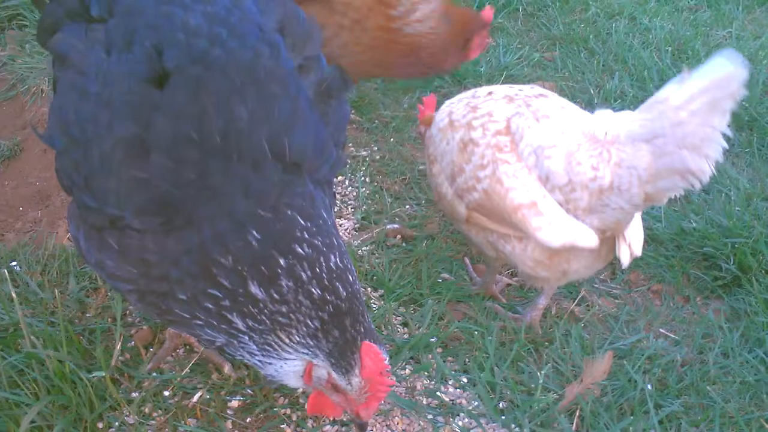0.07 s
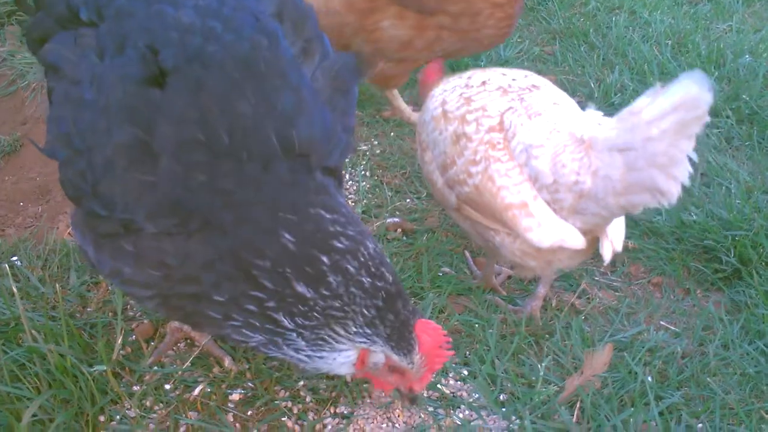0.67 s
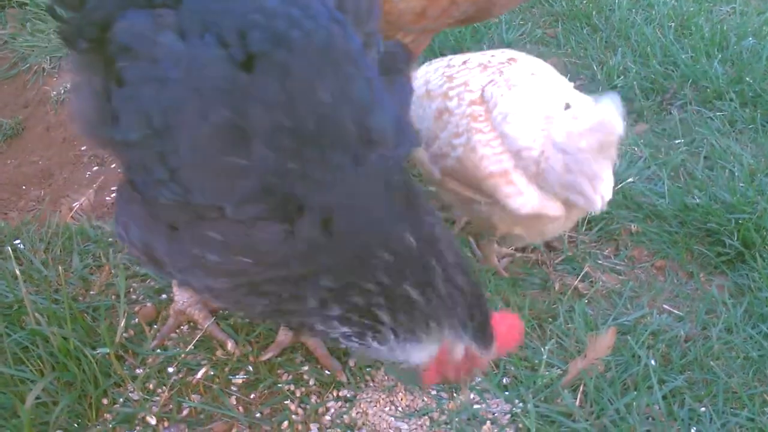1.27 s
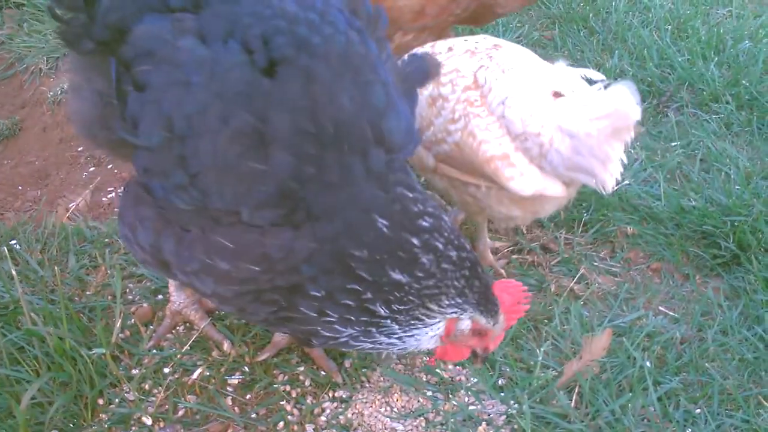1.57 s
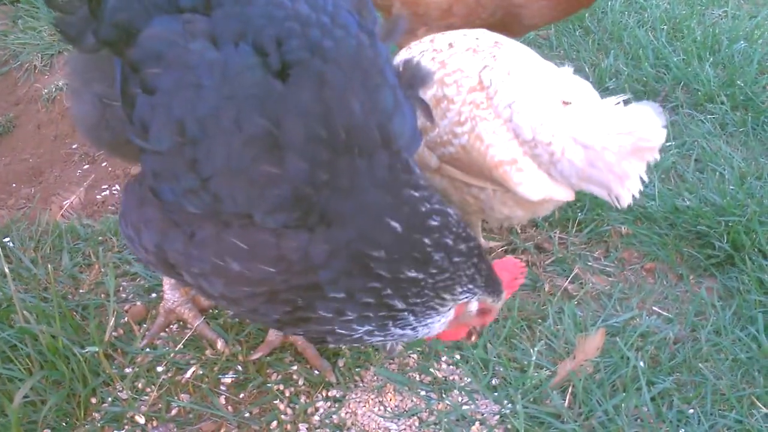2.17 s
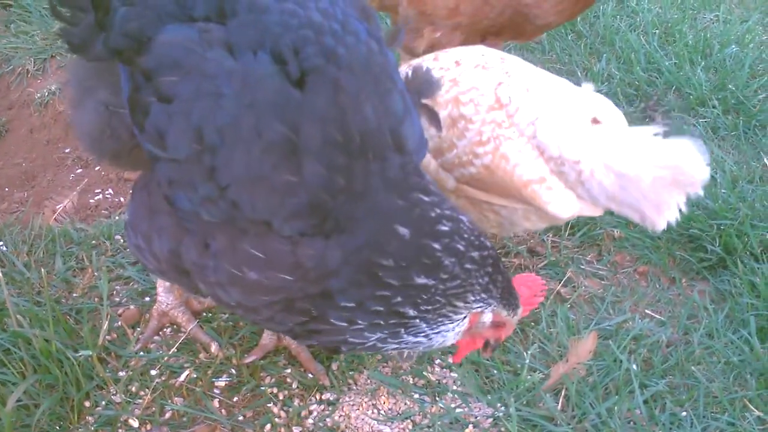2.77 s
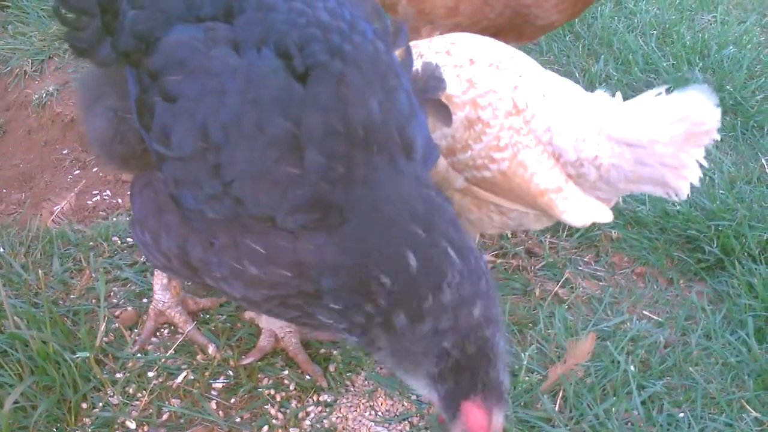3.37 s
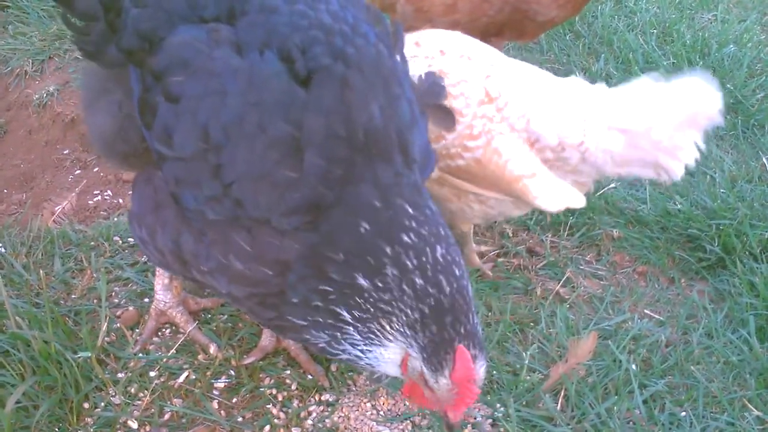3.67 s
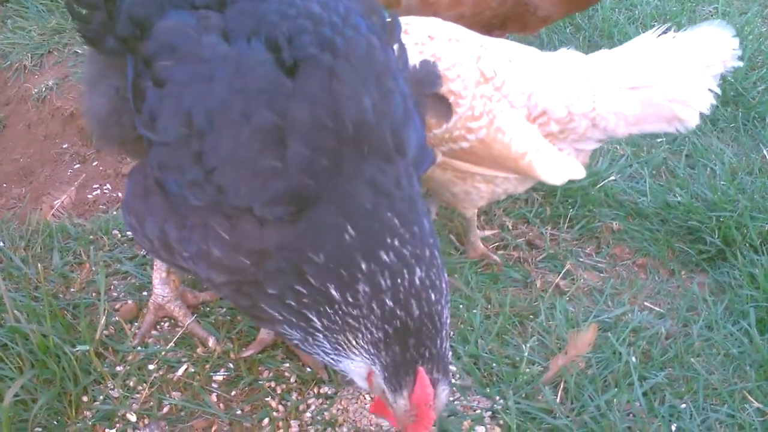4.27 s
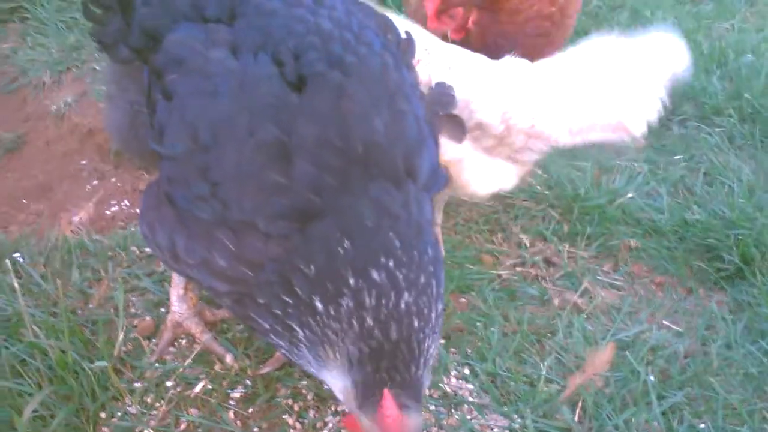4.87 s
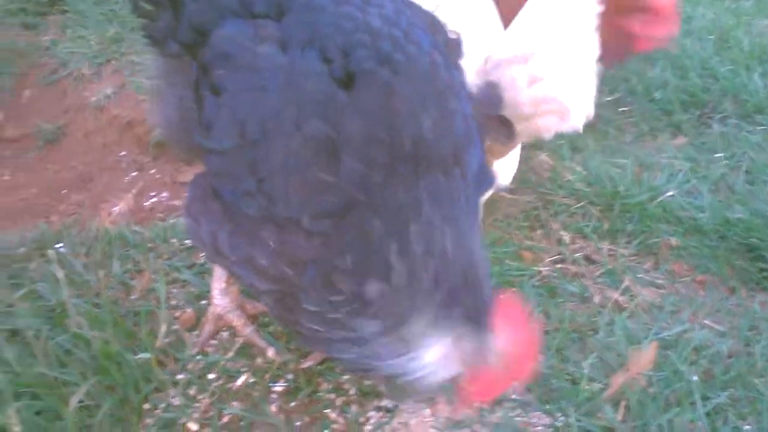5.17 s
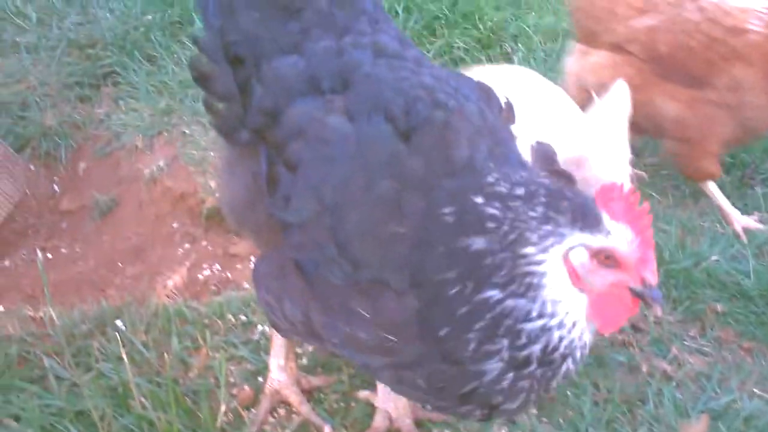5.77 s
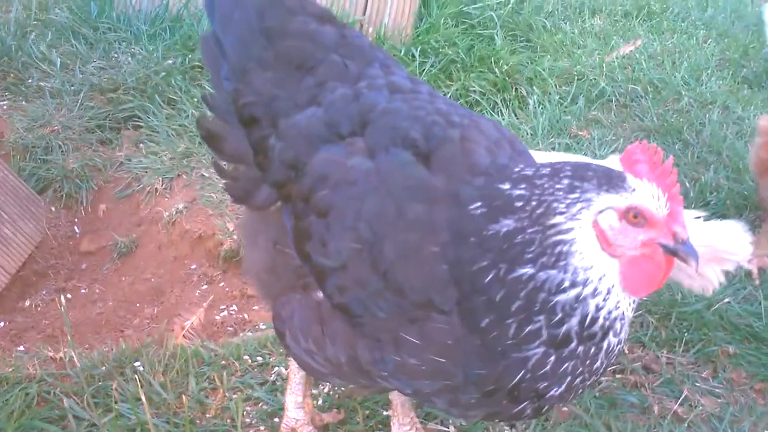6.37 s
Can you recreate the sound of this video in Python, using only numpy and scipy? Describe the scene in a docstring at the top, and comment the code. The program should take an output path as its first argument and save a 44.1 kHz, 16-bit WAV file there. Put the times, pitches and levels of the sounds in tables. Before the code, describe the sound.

Close hen calling outdoors: soft moans, one drawn-out rising call and ever shorter clucks, with low microphone knocks and brushing at the end.

```python
"""An open lawn, hens feeding close to the microphone of a hand-held camera. One gives two soft moans,
then a long swelling call that breaks into ever shorter clucks; a last moan and a small hoot close the
phrase. Her syrinx buzzes through throat and beak. Dull knocks and fumbling reach the microphone through
the camera body, and late on it is raised with a few brushing sounds. Beaks click now and then, and far
birds whistle in a faint outdoor hiss."""
import sys
import numpy as np
from scipy import signal
from scipy.fft import rfft, irfft
from scipy.io import wavfile

SR = 44100
rng = np.random.default_rng(int(sys.argv[2]) if len(sys.argv) > 2 else 0)


def file_out(sig):
    """Save sig as 16-bit WAV at sys.argv[1]."""
    # one column per channel
    cols = np.atleast_2d(sig).T
    # limit, then scale
    lim = np.clip(cols, -1, 1)
    pcm = np.round(lim * 32767).astype(np.int16)
    wavfile.write(sys.argv[1], SR, pcm)


N = 287091
TIME = np.arange(N) / SR


def amp(db):
    """Decibels to gain."""
    return 10 ** (np.asarray(db) / 20)


def unit(x):
    """Scales to rms 1."""
    return x / np.sqrt(np.mean(x ** 2) + 1e-20)


def colour(points, hz):
    """Gain of a (frequency [Hz], level [dB]) spectrum at the given frequencies."""
    f, db = np.transpose(points)
    return amp(np.interp(np.log(hz + 1), np.log(f), db))


def tint(x, points):
    """Filters x by a (frequency [Hz], level [dB]) spectrum; rms 1."""
    return unit(irfft(rfft(x) * colour(points, np.fft.rfftfreq(len(x), 1 / SR)), len(x)))


def curves(rows, t):
    """The columns of a table at the times t."""
    s, *columns = np.transpose(rows)
    return [np.interp(t, s, c) for c in columns]


def wobble(size, hz):
    """Random motion up to about hz; rms about 1."""
    f = np.fft.rfftfreq(SR * 2, 1 / SR)
    slow = unit(irfft(rfft(rng.standard_normal(SR * 2)) / (1 + (f / hz) ** 4)))
    return slow[:size]


def held(start, length, rise_s, fade_s):
    """An envelope that rises to 1 at start, holds, and dies away."""
    return np.exp(-np.maximum(start - TIME, 0) / rise_s - np.maximum(TIME - start - length, 0) / fade_s)


def add(mix, s, sound):
    """Lays a sound into the mix at time s."""
    part = mix[max(round(s * SR), 0):][:len(sound)]
    part += sound[:len(part)]


# hiss over the lawn: (frequency [Hz], relative level [dB])
AIR_COLOUR = [(18, -53), (30, -13.5), (261, -14), (339, -9), (523, -2.5), (619, -1.5), (715, -3),
              (806, -2.5), (1130, -2), (1210, -4.5), (2160, -5.5), (9340, -13), (12100, -9), (20500, -120)]
# camera whine, right at the microphone: (frequency [Hz], level before trim [dB])
WHINE = [(7852, -82), (7882, -82)]


def background(air_db=-63, whine_trim_db=-2):
    """Even outdoor hiss and the camera's thin whine."""
    whine = sum(np.sqrt(2) * amp(db + whine_trim_db) * np.sin(2 * np.pi * hz * TIME) for hz, db in WHINE)
    return amp(air_db) * tint(rng.standard_normal(N), AIR_COLOUR) + whine


# catches, where the near hen's voice flicks upward or bursts out:
# (time [s], length [s], pitch lift [Hz], effort lift [dB], added roughness [0-1])
CATCHES = [(0.367, 0.054, 0, 0, 0.11), (0.96, .04, 1.5, 0, 0.12), (2.553, 0.068, 48, -3, 0.07),
           (2.598, 0.0386, 21.5, -2, 0), (2.663, 0.049, 54.5, -4.5, 0.05), (2.709, 0.045, 45, -4.5, 0.01),
           (2.748, 0.044, 26.5, -2, 0.01), (2.808, 0.025, 27.5, 5, 0.03), (2.836, 0.051, 32, -2.5, 0),
           (2.906, 0.032, 32.5, -1.5, 0), (2.944, 0.037, 44, -3, 0), (3.116, 0.047, 16, 1.5, 0.31),
           (3.283, 0.027, 19, -1, 0.04), (3.471, 0.016, 4.5, 7.5, 0), (3.567, 0.047, 29, -0.5, 0),
           (3.816, 0.04, 68, -2.5, 0.02), (3.851, 0.022, -6, 1.5, 0), (3.928, 0.0465, 26.5, 0, 0),
           (4.174, 0.031, 15, 2, 0), (4.393, 0.025, 7, 3, 0), (4.622, 0.016, 28, 1, 0.09)]


def catches(t):
    """Lift of pitch, effort and roughness at the times t: each catch is one smooth bump."""
    s, length, *lifts = np.transpose(CATCHES)
    bumps = np.cos(np.pi * np.clip((t - s[:, None]) / length[:, None], -.5, .5)) ** 2
    return np.array(lifts) @ bumps


# the hen's voice from close by, four spectra: (frequency [Hz], relative level [dB])
CHEST_COLOUR = [(380, -11.5), (420, -4), (470, -1.5), (620, 0.5)]  # the fundamental
THROAT_COLOUR = [(750, -12), (880, -11.5), (980, 2.5), (1130, -11.5), (1280, -9.5), (1420, -10.5),
                 (1560, -12.5), (1700, -31.5)]  # partials 2 and 3
BEAK_COLOUR = [(1600, -6), (2020, 1.5), (2200, -12.5), (2420, -19), (2900, -19.5), (3380, -16.5),
               (3900, -34.5), (5000, -37)]  # partials 4 to 8, leaving the open beak
RUSH_COLOUR = [(650, -38), (900, 0), (1070, -5.5), (1330, -6.5), (1550, -13), (1720, -43), (2000, -21.5),
               (2250, -22), (3300, -19), (5000, -38)]  # air rushing through the throat


def voice(t, hz, effort_db, rough, chest_db, upper_db, beak_db):
    """The syrinx buzzes through throat and beak; rasp shakes the cycles and adds a rush of air."""
    waver, waver_hz, flutter_db = 0.012, 45, 1.12
    jitter, shimmer, rasp_hz = 0.115, 0.13, 190
    easy_db, full_db = -52, -36.5
    attack_s, release_s = 0.0094, 0.023
    size = len(t)
    lift_hz, lift_db, lift_rough = catches(t)
    hz, effort_db, rough = hz + lift_hz, effort_db + lift_db, rough + lift_rough
    hz = hz * (1 + waver * wobble(size, waver_hz) + jitter * rough * wobble(size, rasp_hz))
    phase = 2 * np.pi * np.cumsum(hz) / SR
    order = np.arange(1, 9)[:, None]
    # pushing harder thins the chest tone and opens the beak; the throat takes the remaining power
    chest = amp(np.minimum(chest_db - 0.81 * (effort_db - easy_db), -1.2)) * colour(CHEST_COLOUR, hz)
    beak = amp(beak_db + 0.25 * (effort_db - full_db))
    throat_share = np.sqrt(np.maximum(1 - chest ** 2 - beak ** 2, .12))
    throat = colour(THROAT_COLOUR, order[1:3] * hz) * amp([[0], [upper_db]])
    throat = throat / np.linalg.norm(throat, axis=0) * throat_share
    heights = np.vstack([chest, throat, beak * colour(BEAK_COLOUR, order[3:] * hz)])
    flutter = amp(flutter_db * np.array([wobble(size, waver_hz) for _ in order]) * order / 2)
    partials = heights * flutter * np.cos(order * phase)
    overtones = partials[1:].sum(0) * (1 + shimmer * rough * wobble(size, rasp_hz))
    # a hoarse syrinx falls into groups of three cycles: a side tone comes and goes in the throat
    side_tone = rough * wobble(size, waver_hz) * np.cos((2 + 1 / 3) * phase + wobble(size, waver_hz))
    air = 0.44 * rough * tint(rng.standard_normal(size), RUSH_COLOUR) * (1 + np.cos(phase))
    envelope = np.minimum((t - t[0]) / attack_s, 1) * np.minimum((t[-1] - t) / release_s, 1)
    return t[0], amp(effort_db) * envelope * (partials[0] + overtones + side_tone + air)


# soft moans near the microphone, one curve each: (time [s], pitch [Hz], effort [dB])
MOANS = [
    [(.115, 521, -52), (.158, 535, -49.5), (.192, 498, -48.5), (.215, 518, -48), (.335, 538, -48),
     (.37, 459, -42.5), (.417, 550, -47)],
    [(.7, 561, -48), (.718, 451, -51.5), (.74, 486.5, -56), (.8, 490, -52), (.934, 511.4, -46),
     (.956, 599, -44), (.98, 447, -45)],
    [(4.89, 476, -66), (4.95, 539, -55), (4.98, 525, -50)],
]


def moan(*points):
    """A soft, fairly level note; the beak opens only near its end, where the effort peaks."""
    t = np.arange(points[0][0], points[-1][0], 1 / SR)
    hz, effort_db = curves(points, t)
    beak_db = -11 + 2.7 * (effort_db - effort_db.max())
    return voice(t, hz, effort_db, rough=0.093, chest_db=3, upper_db=3, beak_db=beak_db)


# far birds, and a thin squeak before the first cluck:
# (time [s], length [s], start pitch [Hz], end pitch [Hz], level [dB])
WHISTLES = [(.12, .1, 5560, 5250, -79), (1.487, 0.057, 2250, 1980, -72), (1.576, 0.105, 2750, 2660, -75),
            (1.726, 0.062, 4360, 3060, -74), (3.335, 0.1, 994, 1287, -65)]


def whistle(s, length, start_hz, end_hz, db):
    """One faint gliding pure tone."""
    size = round(length * SR)
    phase = 2 * np.pi * np.cumsum(np.linspace(start_hz, end_hz, size)) / SR
    return s, np.sqrt(2) * amp(db) * np.sin(phase) * signal.windows.tukey(size, .5)


# dull knocks, carried to the microphone by the camera body: (time [s], level [dB], pitch [Hz])
KNOCKS = [(0.716, -46.5, 176), (0.761, -44.5, 205), (0.826, -41, 166), (0.84, -42, 225), (1.003, -45, 230),
          (1.041, -48, 276), (1.136, -51, 140), (1.215, -45.5, 194), (1.333, -34.5, 352), (1.339, -38, 363),
          (1.347, -36.5, 236), (1.362, -35, 184), (1.371, -36.5, 210), (1.43, -48, 210), (1.468, -50, 227),
          (1.584, -45.5, 163), (1.653, -50, 270), (1.904, -46.5, 155), (1.916, -40.5, 218),
          (2.031, -38.5, 305), (2.048, -47, 305), (2.304, -40.5, 193), (2.574, -38.5, 285),
          (3.014, -50, 188), (3.03, -39, 196.1), (3.17, -48, 229), (3.229, -51.5, 217), (3.816, -42, 174),
          (4.132, -51.5, 196), (4.432, -51, 168), (4.504, -50, 140)]


def knock(s, db, hz, rise_cycles=0.32, fall_cycles=1.0):
    """A heavily damped push: one or two swings of the case."""
    t = np.arange(-SR // 50, SR // 25) / SR
    cycles = t * hz
    swell = np.exp(-(cycles / np.where(t < 0, rise_cycles, fall_cycles)) ** 2)
    travel = swell * np.sin(2 * np.pi * cycles + rng.uniform(-0.9, 0.95))
    return s + t[0], amp(db) * np.gradient(travel, cycles) / (2 * np.pi)


# shifts of the grip on the camera: (time [s], length [s], level before trim [dB])
GRIPS = [(0.722, 0.15, -59), (0.949, 0.11, -62), (1.129, 0.23, -67), (1.383, 0.085, -59.5),
         (1.534, 0.034, -58), (1.625, 0.24, -65), (1.964, 0.094, -65.5), (2.137, 0.072, -58.5),
         (2.321, 0.02, -59), (2.478, 0.025, -63), (2.594, .06, -65.5), (2.77, 0.11, -69),
         (3.005, 0.059, -59.5), (3.158, 0.077, -65.5), (3.292, 0.19, -71), (3.56, 0.023, -68),
         (3.792, 0.02, -61.5), (4.11, 0.026, -66), (4.414, 0.15, -70.5), (4.976, 0.053, -56),
         (5.128, 0.099, -69), (6.088, 0.03, -75)]
# handling noise through the case: (frequency [Hz], relative level [dB])
FUMBLE_COLOUR = [(25, -31), (60, -5), (110, 2), (200, -2.5), (300, -9.5), (450, -16.5), (800, -43)]


def fumble(slips_per_s=200, spread_db=4, rest_db=-85.5, trim_db=2):
    """Fingers creep on the case: many small slips, heard only as low bumps."""
    slips = (rng.random(N) < slips_per_s / SR) * rng.choice([-1, 1], N)
    strength = amp(spread_db * np.minimum(rng.exponential(1, N), 3))
    shifts = sum(amp(db) * held(s, length, rise_s=.015, fade_s=.015) for s, length, db in GRIPS)
    return amp(trim_db) * (amp(rest_db) + shifts) * tint(slips * strength, FUMBLE_COLOUR)


# the near hen's long call: (time [s], pitch [Hz], effort [dB])
LONG_CALL = [(2.08, 387.6, -59.5), (2.18, 380.8, -54.5), (2.2, 414.7, -55), (2.277, 408.6, -52),
             (2.31, 450, -58), (2.353, 450.4, -50.5), (2.374, 478.6, -55.5), (2.488, 481, -47.5),
             (2.511, 456, -45.5), (2.76, 462.6, -40.5), (2.88, 462.3, -40), (2.97, 472, -40),
             (3.03, 464, -37.5), (3.161, 483.5, -38), (3.24, 489.7, -35), (3.348, 488.3, -38.5)]
# its hoarseness: (time [s], roughness [0-1])
LONG_CALL_ROUGHNESS = [(2.45, 0.09), (2.6, 0.14), (2.8, 0.14), (3.06, 0.14), (3.145, 0.02), (3.33, 0.09)]


def long_call():
    """The pitch climbs in steps, then holds while the effort grows to full voice."""
    t = np.arange(LONG_CALL[0][0], LONG_CALL[-1][0], 1 / SR)
    hz, effort_db = curves(LONG_CALL, t)
    rough, = curves(LONG_CALL_ROUGHNESS, t)
    return voice(t, hz, effort_db, rough, chest_db=-1, upper_db=-1, beak_db=-15.5)


# her clucks, just as close: (time [s], length [s], squeak [s], sag [s], squeak pitch [Hz],
# low pitch [Hz], recovered pitch [Hz], final pitch [Hz], effort [dB], upper throat [dB], beak [dB],
# final roughness [0-1])
CLUCKS = [(3.427, 0.2403, 0.041, 0.047, 633, 467.5, 481.4, 518.6, -38.8, -4, -14, 0.19),
          (3.759, 0.2163, 0.023, 0.054, 598.6, 467.6, 497, 499, -38.5, -3, -15, 0.16),
          (4.064, 0.15, .02, 0.0386, 604.4, 423, 468, 433, -43, -4.5, -19, 0.33),
          (4.309, 0.12, 0.022, 0.019, 560, 518, 483, 453, -44, 2.5, -18, 0.38),
          (4.562, 0.109, 0.0058, 0.0257, 610, 441.6, 432.4, 403, -44.5, 1, -34, 0.5),
          (4.844, 0.052, 0.0018, 0.0045, 501, 450, 457, 450, -53.5, 0, -27, 0)]


def cluck(start, length, squeak_s, sag_s, squeak_hz, low_hz, recovered_hz, final_hz,
          effort_db, upper_db, beak_db, final_rough):
    """A rising squeak breaks into the low register; most clucks then sag, recover and end hoarse."""
    rise_hz_per_s, swell_db_per_s, squeak_db = 960, 400, -1
    drop_s, recover_s, start_rough = 0.0128, 0.0299, 0.06
    t = np.arange(0, length, 1 / SR)
    turns = np.cumsum([0, squeak_s, drop_s, sag_s, recover_s])
    pitches = [squeak_hz - rise_hz_per_s * squeak_s, squeak_hz, 1.05 * low_hz, low_hz, recovered_hz]
    hz = np.interp(t, [*turns, max(length, turns[-1])], [*pitches, final_hz])
    push_db = np.interp(t, turns[:3], [squeak_db - swell_db_per_s * squeak_s, squeak_db, 0])
    rough = start_rough + (final_rough - start_rough) * (t / length) ** 1.18
    return voice(start + t, hz, effort_db + push_db, rough, chest_db=0, upper_db=upper_db, beak_db=beak_db)


# small clicks of nearby beaks and of the case: (time [s], relative level [dB], ring [Hz], t60 [s])
CLICKS = [(3.955, -66, 4760, .008), (4.972, -50, 1890, 0.0037), (5.014, -61, 2600, 0.012),
          (5.449, -59, 667, 0.034), (5.451, -54.5, 1290, 0.021)]


def click(s, db, hz, t60, crack_s=0.0036):
    """A tiny crack and a short woody ring."""
    t = np.arange(SR // 10) / SR
    ring = np.sin(2 * np.pi * hz * t) * np.exp(-np.log(1000) * t / t60)
    crack = rng.standard_normal(len(t)) * np.exp(-t / crack_s)
    return s, amp(db) * (3.3 * ring + 0.5 * crack)


# the near hen's closing hoot: (time [s], pitch [Hz], level [dB])
HOOT = [(4.96, 745, -66), (4.969, 730, -51), (4.976, 754, -42.5), (4.987, 725, -47.5), (5.002, 767, -49),
        (5.01, 775, -44), (5.024, 780, -39.5), (5.036, 753, -48), (5.046, 740, -61)]


def hoot(octave_db=-30, waver=0.01):
    """A short, nearly pure note with the beak shut."""
    t = np.arange(HOOT[0][0], HOOT[-1][0], 1 / SR)
    hz, db = curves(HOOT, t)
    phase = 2 * np.pi * np.cumsum(hz * (1 + waver * wobble(len(t), hz=120))) / SR
    return t[0], np.sqrt(2) * amp(db) * (np.sin(phase) + amp(octave_db) * np.sin(2 * phase))


# strokes of a hand over the case, right by the microphone: (time [s], length [s], level [dB])
STROKES = [(4.995, 0.043, -56), (5.215, 0.14, -53), (5.434, 0.042, -52), (5.587, .18, -53.5)]
# the hollows of the case: (frequency [Hz], relative level [dB])
RUSTLE_COLOUR = [(250, -38), (650, -13.5), (900, -8), (1150, -1), (1330, -1.5), (1500, -7), (1800, 0.5),
                 (2300, -8), (2900, -6.5), (4200, -12.5), (5600, -12), (7500, -22), (9500, -22)]


def rustle(slips_per_s=14000, spread_db=2.5, raise_s=5.244, raise_db=-56.5):
    """Dense tiny slips of skin on the case: arched strokes, and a light rub as the camera is raised."""
    slips = (rng.random(N) < slips_per_s / SR) * rng.standard_normal(N)
    strength = amp(spread_db * np.minimum(rng.exponential(1, N), 4))
    strokes = sum(amp(db) * np.sin(np.pi * np.clip((TIME - s) / length, 0, 1)) for s, length, db in STROKES)
    rubbing = amp(raise_db) * held(raise_s, 0, rise_s=.09, fade_s=0.44)
    return np.hypot(strokes, rubbing) * tint(slips * strength, RUSTLE_COLOUR)


def scene():
    """All sources at one microphone, with no echo on the open lawn."""
    mix = background() + fumble() + rustle()
    add(mix, *long_call())
    add(mix, *hoot())
    events = [(moan, MOANS), (cluck, CLUCKS), (knock, KNOCKS), (click, CLICKS), (whistle, WHISTLES)]
    for source, table in events:
        for row in table:
            add(mix, *source(*row))
    return mix[None]


def record(dry, edge_hz=9560):
    """The microphone opens after a tenth of a second; the treble is cut steeply above edge_hz."""
    opened = amp(np.interp(TIME, [.06, .085, .1, .108], [-90, -35, -18, 0]))
    lowpass = signal.firwin(511, edge_hz, window=("kaiser", 9), fs=SR)
    return signal.oaconvolve(dry * opened, lowpass[None], "same")


dry = scene()
out = record(dry)
file_out(out)
```